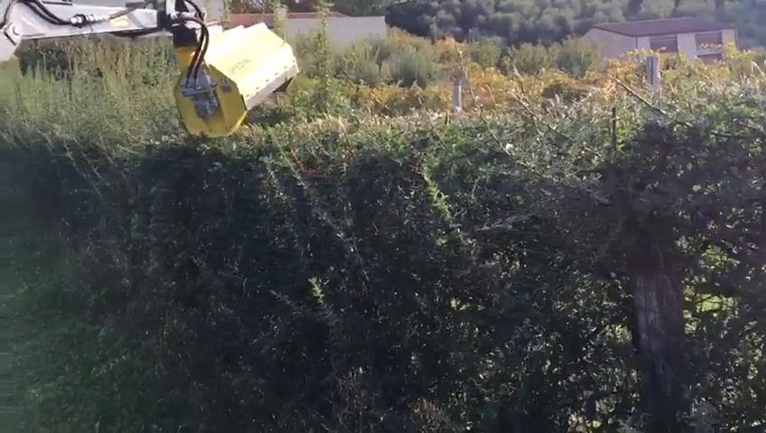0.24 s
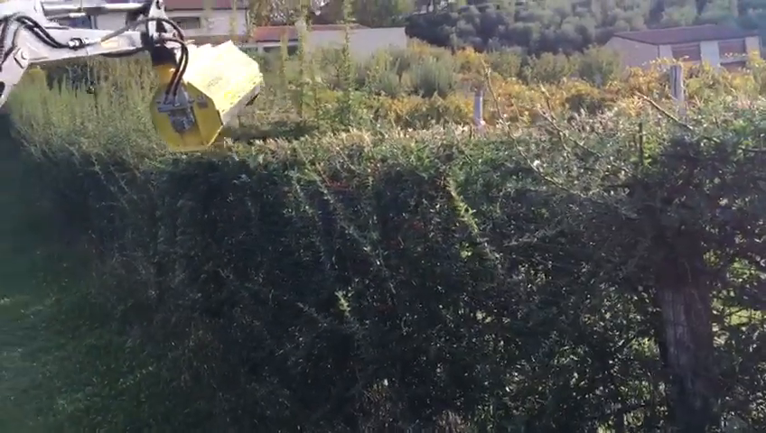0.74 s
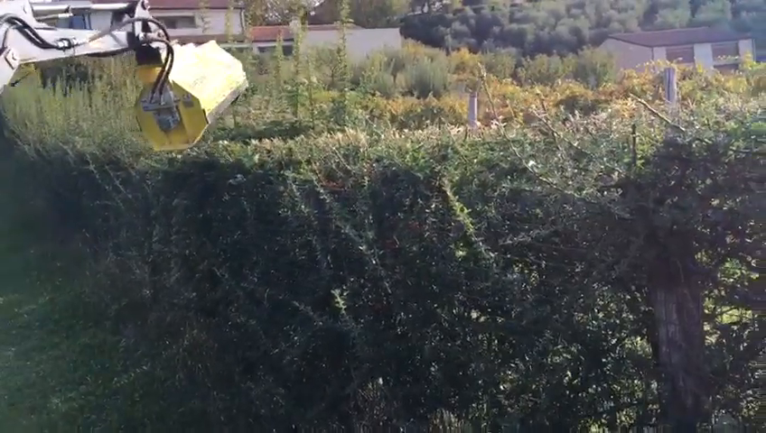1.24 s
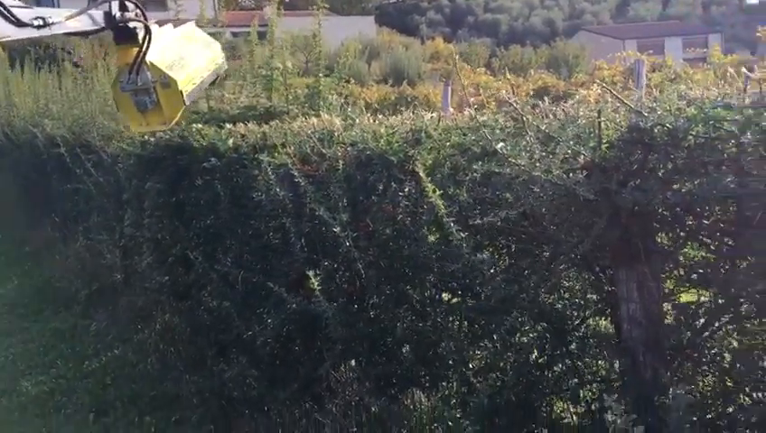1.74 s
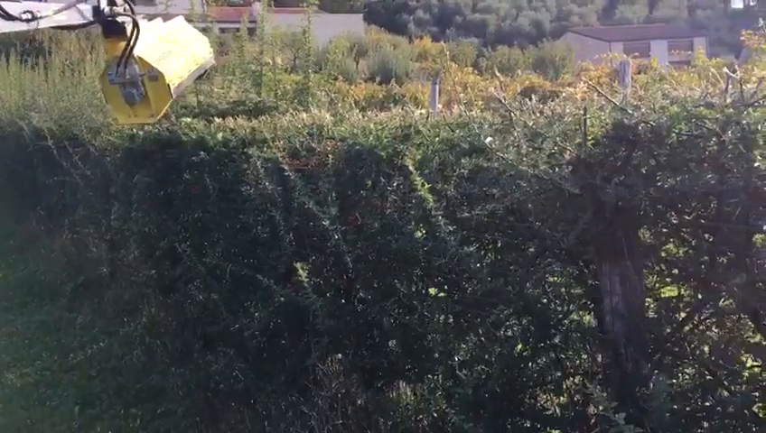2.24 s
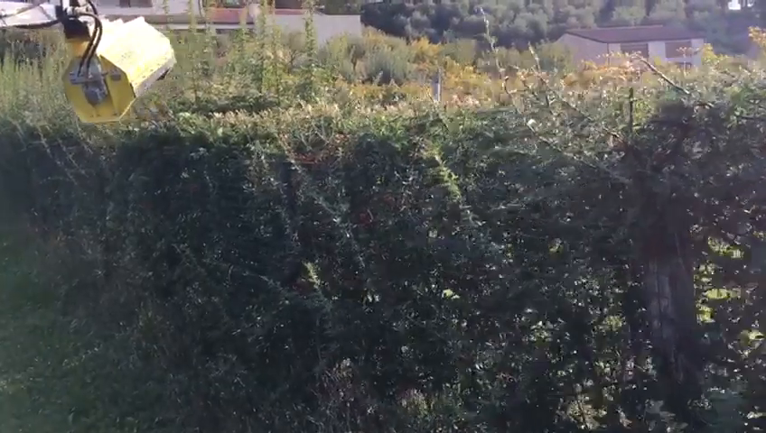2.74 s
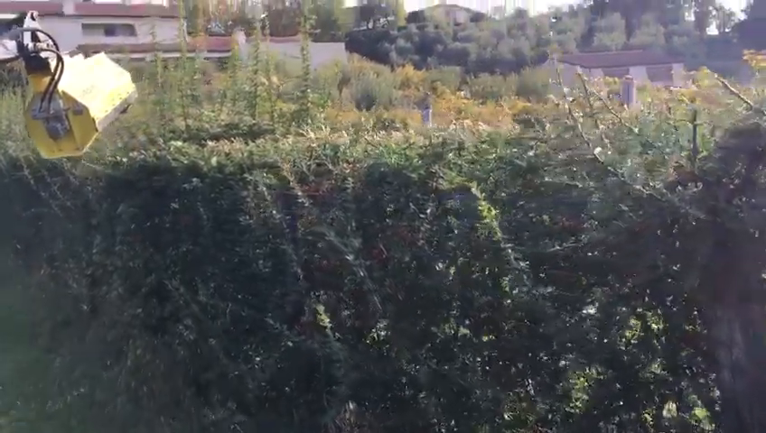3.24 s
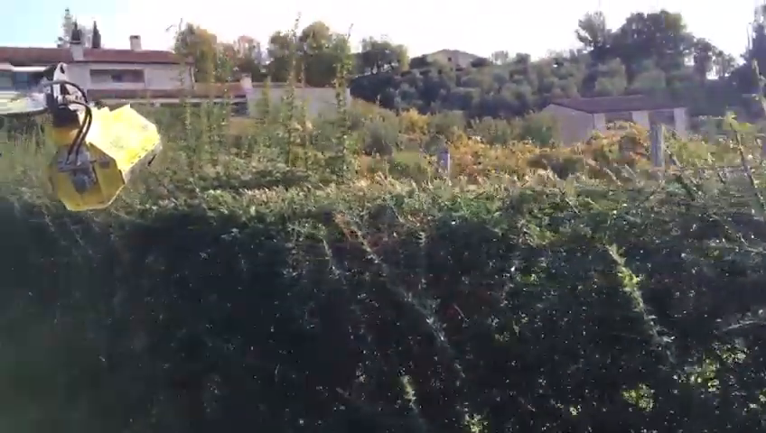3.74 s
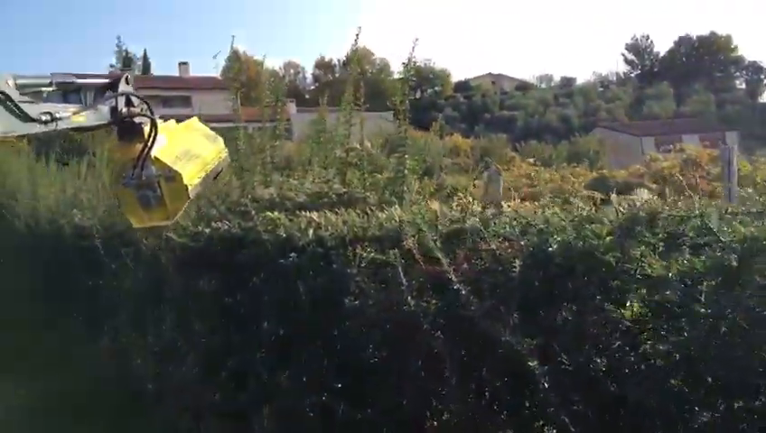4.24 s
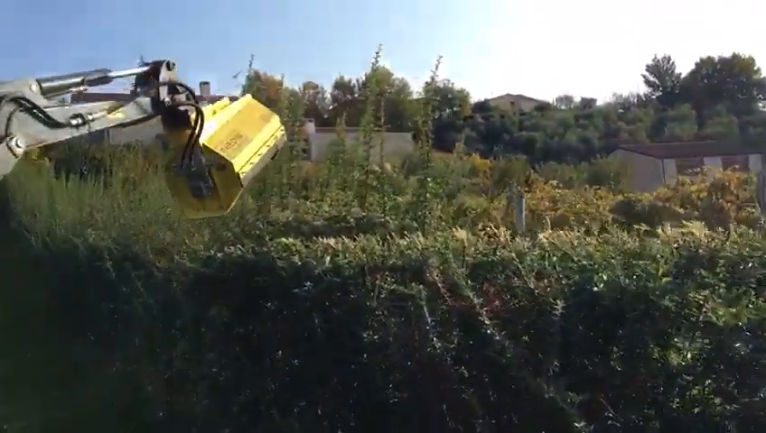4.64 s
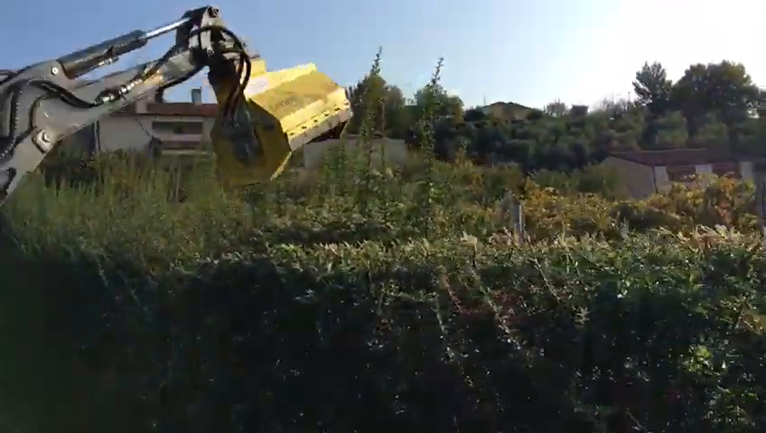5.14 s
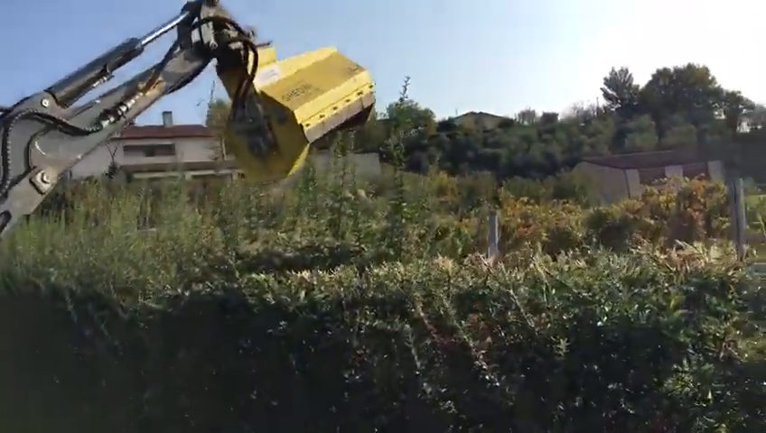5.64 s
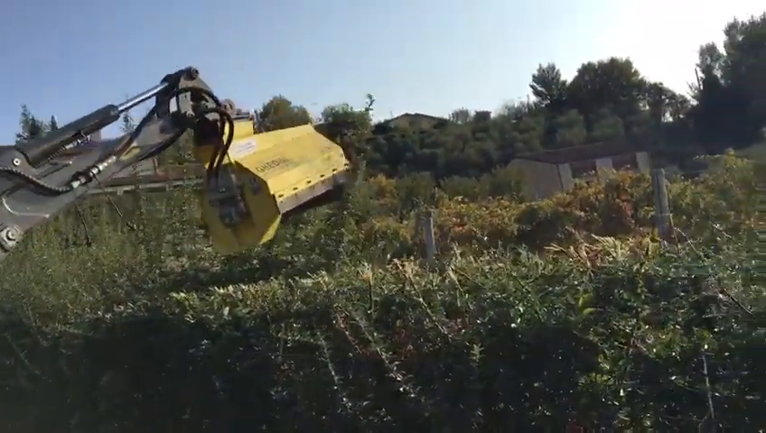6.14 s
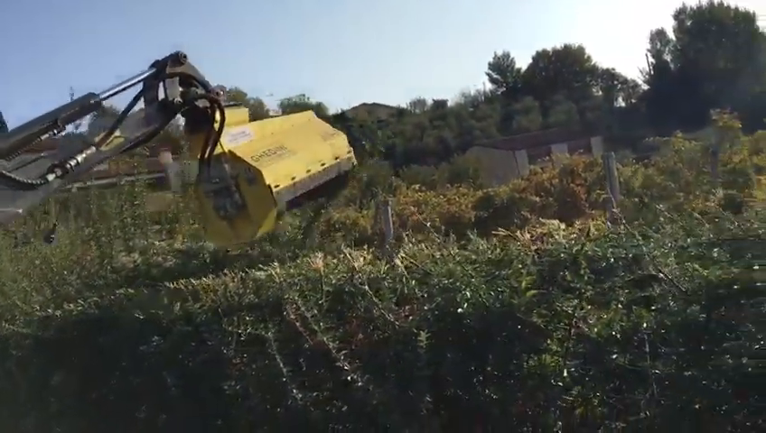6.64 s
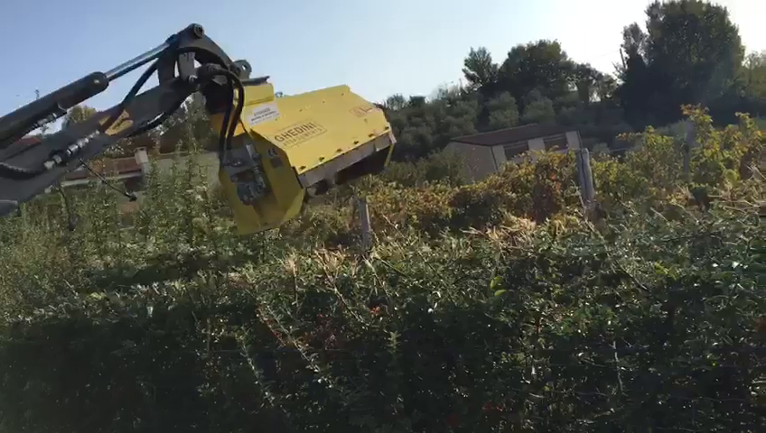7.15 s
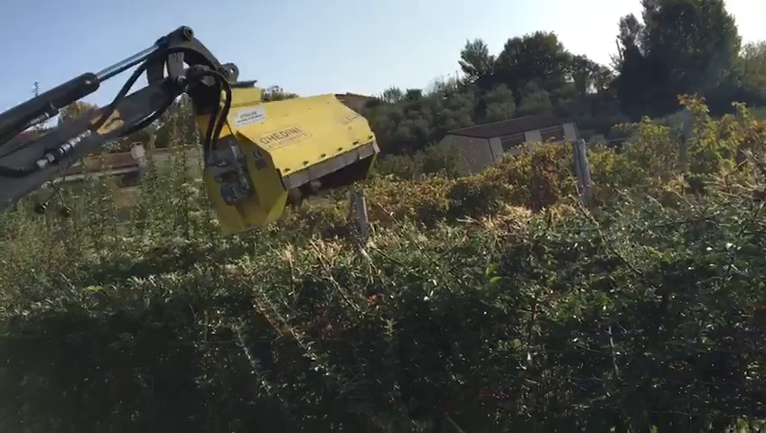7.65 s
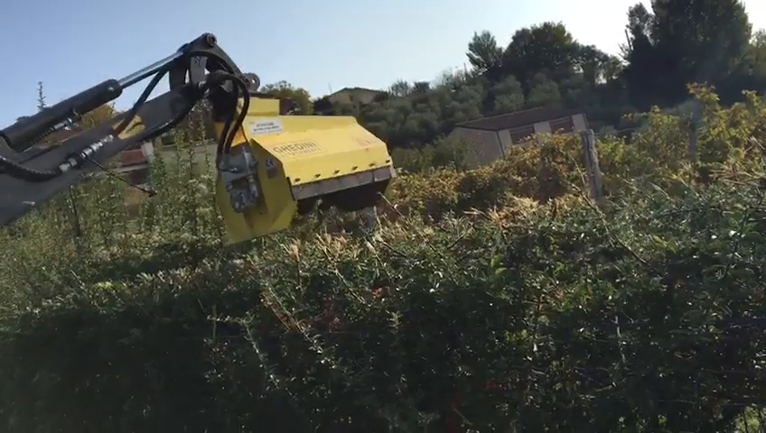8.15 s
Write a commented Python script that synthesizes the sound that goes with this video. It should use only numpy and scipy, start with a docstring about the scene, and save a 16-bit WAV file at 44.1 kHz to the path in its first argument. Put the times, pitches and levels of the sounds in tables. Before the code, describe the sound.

A steady, heavy low diesel drone dominates, its speed dipping slightly under load. Over it come dry clatter, low rumble and hollow cover boom, then the gliding whine of a flail motor and its breathy whirl. Soft leafy swishing comes early, oil hiss around the middle, a sharp little burst of twig snaps near seven seconds, then the whine climbs to the end. Mono, open air, dull on top.

```python
"""The three-cylinder diesel of a mini excavator drones and knocks outdoors, as pulses locked to its firing
rate. The excavator swings a hydraulic flail head over a hedge: the head's motor whines on partials of its gear
tooth rate as it speeds up and slows down, and the rotor churns the air, made of coloured noise. Oil hisses in
the valves, mostly when the boom moves, soft growth swishes against the hood in resonant noise, and a few twigs
are shredded in sprays of tiny snaps."""
import sys
import numpy as np
from scipy import signal
from scipy.fft import rfft, irfft, next_fast_len
from scipy.io import wavfile

SR = 44100
rng = np.random.default_rng(int(sys.argv[2]) if len(sys.argv) > 2 else 0)


def to_wav(s):
    """Save 16-bit WAV."""
    ch = np.atleast_2d(s).T  # columns
    pcm = np.round(np.clip(ch, -1, 1) * 32767)  # PCM
    wavfile.write(sys.argv[1], SR, pcm.astype(np.int16))


N = 369999
TIME = np.arange(N) / SR
CUTOFF_HZ = 11200   # nothing much is heard above this


def from_db(db):
    """Turn decibels into gain."""
    return 10 ** (np.asarray(db) / 20)


def rms_one(x):
    """Scale a signal to a root-mean-square level of 1."""
    return x / np.sqrt(np.mean(x ** 2) + 1e-20)


def in_time(rows):
    """Join the points of a (time, value) table by straight lines."""
    times, values = np.transpose(rows)
    return np.interp(TIME, times, values)


def cycles(rate_hz):
    """Count the cycles of a changing rate since the start."""
    return np.cumsum(rate_hz) / SR


def noise():
    """White noise: all pitches at once."""
    return rng.standard_normal(N)


def drift(rate_hz):
    """Slow random wandering with spread 1, made at every 40th sample and joined by straight lines."""
    step, settle = 40, 2000
    r = np.exp(-2 * np.pi * rate_hz * step / SR)
    steps = rng.standard_normal(N // step + settle + 2)
    slow = signal.lfilter([1], [1, -2 * r, r * r], steps)[settle:]
    return np.interp(np.arange(N) / step, np.arange(len(slow)), rms_one(slow))


def at_hz(spectrum, hz):
    """Read the gain of a (frequency, level) table at given frequencies."""
    points, db = np.transpose(spectrum)
    return from_db(np.interp(np.log(hz), np.log(points), db))


def colour(x, spectrum):
    """Give a sound a spectrum; white noise keeps its power."""
    size = next_fast_len(N + 4096)
    bins = np.maximum(np.fft.rfftfreq(size, 1 / SR), 1)
    gain = at_hz(spectrum, bins) * (bins < CUTOFF_HZ)
    return irfft(rfft(x, size) * rms_one(gain), size)[:N]


def resonate(x, hz, width_hz):
    """Let one resonance ring: the narrower it is, the longer it lasts."""
    r = np.exp(-np.pi * width_hz / SR)
    return signal.lfilter([1, 0, -1], [1, -2 * r * np.cos(2 * np.pi * hz / SR), r * r], x)


def boom(hz, width_hz):
    """A panel shaken at random sounds around its own pitch."""
    once = resonate(noise(), hz, width_hz)
    return rms_one(resonate(once, hz, width_hz))


def partials(phase, table, waver_db, waver_hz, jitter):
    """Sines locked to a shaft, each wavering in level and in phase (jitter in cycles)."""
    total = 0
    for order, db in table:
        level = np.sqrt(2) * from_db(db + waver_db * drift(waver_hz))
        turn = order * phase + rng.random() + jitter * drift(waver_hz)
        total = total + level * np.sin(2 * np.pi * turn)
    return total


def swells(events, ramp_s):
    """Events fade in, hold and fade out; each fade is centred on the start or end of its event."""
    total = 0
    for start, length, db in events:
        inside = np.minimum(TIME - start, start + length - TIME)
        total = total + from_db(db) * np.clip(.5 + inside / ramp_s, 0, 1)
    return total


def follow(x, seconds):
    """Follow a control with some inertia; zero or less follows practically at once."""
    r = np.exp(-1 / (max(seconds, 1 / SR) * SR))
    return x[0] + signal.lfilter([1 - r], [1, -r], x - x[0])


# how far the machine has swung round towards the listener: (time [s], share [0-1])
SWING = [(0, 0.42), (3.6, 0.19), (4.9, 0.79), (8.39, 0.9)]


def swing():
    """The turn of the machine changes how strongly its parts are heard."""
    return in_time(SWING)


# the hood brushes through soft growth: (start [s], length [s], level [dB])
BRUSHES = [(1.22, 0.16, -38), (2.13, 0.35, -39.5), (2.55, 1.08, -39.5), (4.9, 0.5, -49), (6.25, 0.62, -52),
           (7.85, .8, -40.5)]


def leaves():
    """Soft growth swishes against the steel hood: unsteady noise around one resonance."""
    flutter = from_db(1.3 * drift(40))
    return swells(BRUSHES, ramp_s=0.35) * flutter * boom(hz=1160, width_hz=520)


# twigs caught by the flails: (time [s], starting level [dB], time to fall by 8.7 dB [s])
TWIGS = [(6.362, -34.5, 0.035), (6.734, -37.5, 0.08), (6.807, -29, 0.029), (6.82, -34.5, 0.18),
         (6.878, -23.5, 0.014), (6.886, -21, 0.018), (6.905, -21.5, 0.011), (6.912, -28.5, 0.026),
         (6.971, -31.5, 0.016)]
# tone of the snaps: (frequency [Hz], relative level per Hz [dB])
TWIG_TONE = [(900, -10), (1900, -2), (2800, -2.5), (3900, 1.5), (4800, -8.5), (6500, -2), (7100, -1.5),
             (7800, -2.5), (8700, 0.5), (10500, -3.5)]


def twigs(snaps_per_s=3500, spread_db=4):
    """Each twig is torn apart in a dying spray of tiny snaps."""
    power = 0
    for start, db, length in TWIGS:
        dying = np.exp(-2 * np.abs(TIME - start) / length)
        power = power + from_db(db) ** 2 * (TIME >= start) * dying
    strength = from_db(spread_db * np.minimum(rng.exponential(1, N), 3))
    snaps = (rng.random(N) < snaps_per_s / SR) * rng.choice([-1, 1], N) * strength
    return colour(rms_one(snaps) * np.sqrt(power), TWIG_TONE)


# flail motor, spun up in bursts and coasting in between: (time [s], gear tooth rate [Hz])
MOTOR_SPEED = [(0, 440), (.3, 440), (.6, 452), (1.05, 452), (1.45, 502), (1.65, 513), (2.6, 490),
               (3.3, 464), (3.77, 453), (4.08, 496), (4.28, 508), (5.2, 481), (5.93, 452), (6.5, 473),
               (7.3, 475), (7.85, 522), (8.08, 535), (8.39, 538)]


def motor_tooth_rate():
    """The passing gear teeth of the hydraulic motor set its pitch."""
    return in_time(MOTOR_SPEED)


# oil hiss swells, mostly while the boom moves: (start [s], length [s], oil flow level [dB])
OIL_SWELLS = [(2.0, 0.47, -42), (4.0, .45, -49), (4.8, 0.59, -40.5), (8.3, .3, -46)]
# tone of the oil hiss: (frequency [Hz], relative level per Hz [dB])
OIL_TONE = [(1500, -17), (2300, 3.5), (3800, -3), (4700, -7.5), (5400, 2.5), (6200, 0.5), (6900, 3.5),
            (7700, -2.5), (8700, 1.5), (10500, 2.5)]
# pressure ripple heard in the oil: (multiple of the tooth rate, level relative to the flow [dB])
RIPPLE = [(2, -5.5), (3, -6.5), (4, -7), (5, -6.5), (6, -5), (7, -8.5), (8, -9.5), (11, -11), (12, -10.5),
          (14, -14), (18, -14)]
VALVE_RAMP_S, VALVE_LEAK_DB = 0.18, -52   # the valve's opening time; its flow level when shut


def oil_valves():
    """Throttled oil hisses in swells, mostly while the boom moves, with a hoarse ripple from the motor's teeth."""
    ripple = partials(cycles(motor_tooth_rate()), RIPPLE, waver_db=4.5, waver_hz=35, jitter=.3)
    flow = np.hypot(from_db(VALVE_LEAK_DB), swells(OIL_SWELLS, VALVE_RAMP_S))
    return flow * from_db(0.61 * drift(25)) * (colour(noise(), OIL_TONE) + ripple)


# level of the churned air: (time [s], level [dB])
AIR_LEVEL = [(0, -34.5), (.9, -33.5), (2.3, -33), (3.7, -34.5), (5.2, -32), (6.1, -34), (7.3, -32.5),
             (8.39, -31)]
# tone of the churned air: (frequency [Hz], relative level per Hz [dB])
AIR_TONE = [(300, -26.5), (700, -3.5), (950, 0.5), (1400, -2.5), (1900, -3), (2400, -5.5), (2800, -9),
            (4500, -18.5), (10000, -28)]


def rotor_air():
    """The whirling flails churn the air into an unsteady rush of noise."""
    level = from_db(in_time(AIR_LEVEL) + 1.34 * drift(30))
    return level * colour(noise(), AIR_TONE)


# the motor's low partials, before the housing:
# (multiple of the tooth rate, coasting [dB], added when driven [dB], added once swung round [dB])
GROWL = [(1, -54, 16, -3), (2, -45.5, 5, -2.5), (3, -56, 12, -2.5), (4, -57.5, 10, 0.5)]
# how strongly the motor housing radiates them: (frequency [Hz], gain [dB])
HOUSING = [(440, 2), (465, 1.5), (480, 2.5), (540, 1.5), (870, -1.5), (950, 0), (1100, -2), (1350, -0.5),
           (1460, 1.5), (1820, -6), (1910, 5.5), (2100, 0)]


def motor_growl(tooth_hz, drive):
    """The low partials swell as they glide through the resonances of the motor housing."""
    teeth, turn = cycles(tooth_hz), swing()
    total = 0
    for order, coasting_db, driven_db, swung_db in GROWL:
        level = from_db(coasting_db + driven_db * drive + swung_db * turn)
        tone = partials(teeth, [(order, 0)], waver_db=3.0, waver_hz=8.9, jitter=0.04)
        total = total + level * at_hz(HOUSING, order * tooth_hz) * tone
    return total


# high partials, before the hood: (multiple of the tooth rate, relative level [dB])
WHISTLE = [(7, -0.5), (9, -10), (11, -4), (12, -2.5), (13, -1), (14, -6.5), (15, -4), (16, -2), (18, -4)]
# how strongly the flail hood radiates them: (frequency [Hz], gain [dB])
HOOD = [(3000, -6), (4300, 3), (4750, -10.5), (5250, -1.5), (5500, -9), (5850, 4), (6150, 0), (6420, 4.5),
        (6560, -6), (6800, -3.5), (7050, -5.5), (7380, 4), (7600, -13), (8800, -7)]
# gain of all the high partials: coasting, added when driven, added once swung round
WHISTLE_DB, WHISTLE_DRIVEN_DB, WHISTLE_SWUNG_DB = -65, 9.5, 8


def motor_whistle(tooth_hz, drive):
    """The high partials swell as they glide through the resonances of the flail hood."""
    teeth = cycles(tooth_hz)
    total = 0
    for order, db in WHISTLE:
        tone = partials(teeth, [(order, db)], waver_db=3.5, waver_hz=8, jitter=0.039)
        total = total + at_hz(HOOD, order * tooth_hz) * tone
    return from_db(WHISTLE_DB + WHISTLE_DRIVEN_DB * drive + WHISTLE_SWUNG_DB * swing()) * total


# spells in which oil drives the motor: (start [s], length [s], pressure relative to full [dB])
FEEDS = [(.1, 0.93, -7), (1.03, 0.64, .5), (3.8, .45, -3), (6.02, .6, -6), (6.65, 0.97, -1),
         (7.66, 0.54, -1)]


def flail_head():
    """The gear motor whines louder while oil pressure drives it; the flails churn the air."""
    tooth_hz = motor_tooth_rate()
    drive = swells(FEEDS, ramp_s=0.2)   # the pressure takes time to build and to fall
    return motor_growl(tooth_hz, drive) + motor_whistle(tooth_hz, drive) + rotor_air()


# diesel speed, sagging whenever the pump draws power: (time [s], firing rate [Hz])
FIRING = [(0.0, 48.28), (0.58, 48.13), (0.98, 50.96), (1.22, 46.77), (1.76, 49.94), (1.99, 48.66),
          (2.84, 49.65), (3.27, 49.27), (3.48, 50.67), (3.74, 50.43), (3.91, 46.21), (4.2, 48.9),
          (4.82, 49.33), (4.93, 50.01), (5.71, 49.89), (5.88, 46.49), (6.07, 48.6), (6.38, 48.14),
          (6.89, 48.9), (7.63, 47.94), (8.24, 49.65), (8.39, 48.79)]


def firing_rate():
    """The speed of the engine sets how often a cylinder fires."""
    return in_time(FIRING)


FREE_FIRING_HZ, FULL_LOAD_SAG_HZ = 50, 3   # the governor lets the speed droop, which tells the load


def engine_gain(voice):
    """Gain of one of the engine's voices, from the load and from the way the machine faces."""
    free_db, load_db, swung_db, lag_s = voice
    load = (FREE_FIRING_HZ - firing_rate()) / FULL_LOAD_SAG_HZ
    return from_db(free_db + load_db * follow(load, lag_s) + swung_db * swing())


# partials of the belt-driven fan: (multiple of the firing rate, relative level [dB])
FAN = [(4.9, -6.5), (6.73, 0), (13.46, -12.5)]
# the fan's tone swells: (start [s], length [s], gain added to the resting gain [dB])
FAN_SWELLS = [(.05, 0.46, -34.5), (3.8, 0.45, -39.5), (5.85, .85, -37.5), (7.2, .6, -41)]
FAN_REST_DB, FAN_RAMP_S = -43, 0.27   # the fan's gain between its swells, and their fade time


def fan(firings):
    """The cooling fan hums on a few partials that swell now and then."""
    level = from_db(FAN_REST_DB) + swells(FAN_SWELLS, FAN_RAMP_S)
    return level * partials(firings, FAN, waver_db=1.5, waver_hz=4.0, jitter=0.032)


# level of the engine's rumble: (time [s], level [dB])
RUMBLE_LEVEL = [(0, -30.5), (.9, -28), (1.4, -30), (2.2, -29), (3.9, -31.5), (4.6, -28.5), (6.1, -31),
                (8.39, -30)]
# tone of the rumble: (frequency [Hz], relative level per Hz [dB])
RUMBLE_TONE = [(20, -10.5), (45, 1.5), (120, 3), (215, -8), (290, 0), (390, -3.5), (450, -7), (580, -4.5),
               (670, -2), (760, -9), (1100, -22.5), (3000, -44)]


def rumble():
    """The engine rumbles: noise that is strongest at low pitches."""
    return from_db(in_time(RUMBLE_LEVEL)) * colour(noise(), RUMBLE_TONE)


# deep boom: (running free [dB], added at full load [dB], added once swung round [dB], lag behind the load [s])
DEEP_BOOM = (-41.5, 0, 8, 4.2)
# level of the cover's hollow boom: (time [s], level [dB])
HOLLOW_LEVEL = [(0, -39.5), (.45, -31), (.75, -41), (1.2, -39.5), (1.5, -28.5), (2, -38), (3, -39),
                (3.9, -35), (5.6, -55.5), (8.39, -41)]


def engine_cover():
    """The engine cover booms at two pitches of its own."""
    deep = engine_gain(DEEP_BOOM) * boom(hz=192.0, width_hz=120)
    hollow = from_db(in_time(HOLLOW_LEVEL)) * boom(hz=386.3, width_hz=43)
    return deep + hollow


# crack: (running free [dB], added at full load [dB], added once swung round [dB], lag [s], 0 or less = at once)
CRACK = (-53.5, 9, -10.5, -1.8)
# tone of the crack: (frequency [Hz], relative level per Hz [dB])
CRACK_TONE = [(1500, -8.5), (4000, -5.5), (4900, 1), (6000, 2.5), (7700, -6.5), (9000, 6.5), (10500, -1.5)]


def injection(firings, delay=.57, decay=.08):
    """Every firing starts with a short bright crack, louder under load; delay and decay in firing periods."""
    age = (firings - delay) % 1
    cracks = colour(noise() * np.exp(-age / decay), CRACK_TONE)
    return engine_gain(CRACK) * rms_one(cracks)


# combustion knock, one row a cylinder: (relative clatter [dB], relative block ring [dB])
CYLINDERS = [(0, 0.5), (-8.5, 2.5), (0, -6)]
# tone of the casing's clatter: (frequency [Hz], relative level per Hz [dB])
CLATTER_TONE = [(1200, -19), (2300, -4), (3020, -3.5), (3180, 4.5), (3700, 2), (4400, 2.5), (4900, -7),
                (5800, -2.5), (6600, -6), (7800, -8.5), (9000, -7.5), (10500, -12)]
# level of the casing's clatter: (time [s], level [dB])
CLATTER_LEVEL = [(0, -36), (.8, -38), (3, -36.5), (5.2, -38), (5.8, -40), (7.3, -38.5), (8.39, -37.5)]
# modes of the engine block: (frequency [Hz], width [Hz], relative blow strength [dB])
BLOCK_MODES = [(2176, 140, -2.5), (2342, 72, -1.5)]
# level of the engine block's ring: (time [s], level [dB])
BLOCK_LEVEL = [(0, -40), (1.9, -41.5), (2.5, -42.5), (3.7, -47), (4.7, -39), (5.6, -48.5), (6.7, -42.5),
               (8, -43.5), (8.39, -40.5)]


def combustion(firings, delay=.57, decay=0.2, scatter_db=2.26):
    """Each firing rattles the casing and rings the block, as hard as its cylinder; times in firing periods."""
    stroke, age = np.divmod(firings - delay, 1)
    stroke = stroke.astype(int)
    rattle_db, ring_db = np.array(CYLINDERS)[stroke % 3].T
    chance_db = scatter_db * rng.standard_normal((stroke.max() + 2, 2))   # no two firings are alike
    rattle_chance_db, ring_chance_db = chance_db[stroke].T

    bursts = from_db(rattle_db + rattle_chance_db) * np.exp(-age / decay)
    steady = .52   # some rattle goes on between the bursts
    clatter = rms_one(colour(noise() * np.hypot(steady, bursts), CLATTER_TONE))

    fires = np.diff(stroke, prepend=stroke[0]) > 0
    blows = fires * from_db(ring_db + ring_chance_db)
    block = 0
    for hz, width_hz, db in BLOCK_MODES:
        block = block + from_db(db) * resonate(blows * rng.choice([-1, 1], N), hz, width_hz)
    block = resonate(block, hz=2180, width_hz=580)   # the cover takes a moment to pick up the ring
    return from_db(in_time(CLATTER_LEVEL)) * clatter + from_db(in_time(BLOCK_LEVEL)) * rms_one(block)


# four exhaust voices, each: (running free [dB], added at full load [dB], added once swung round [dB],
# lag behind the load [s], 0 or less = at once)
THUD = (-24, -9.5, 1.5, .09)
DRONE = (-14.5, 1.8, 0.5, .16)
THIRD_HARMONIC = (-29.5, 7.5, -8, -0.4)
EXHAUST_EDGE = (-2.5, -1, 3.5, 2.5)   # a gain on all the overtones
# how squarely the tailpipe faces the listener: (time [s], change of the drone's level [dB])
TAILPIPE = [(0, -0.5), (3.6, -1.1), (4.3, -0.6), (7.1, -2.6), (8.39, -2.7)]
# exhaust overtones, before the edge gain: (cycles per round of three firings, level [dB])
OVERTONES = [(7, -38.5), (8, -47), (10, -41), (12, -33.5), (15, -39), (18, -43.5), (21, -53), (24, -46.5),
             (27, -56.5), (30, -48)]


def exhaust(firings, unsteady=0.0018):
    """The silencer booms at twice the firing rate; load trades thud for third harmonic; cylinders differ."""
    phase = 2 * np.pi * (firings + unsteady * drift(8.6))
    thud = engine_gain(THUD) * from_db(0.37 * drift(4.4)) * np.cos(phase)
    facing = from_db(in_time(TAILPIPE) + 0.26 * drift(31))
    drone = engine_gain(DRONE) * facing * np.sin(2 * phase)
    third = engine_gain(THIRD_HARMONIC) * from_db(1.2 * drift(9)) * np.sin(3 * phase)
    # unequal cylinders add lines between the multiples of the firing rate
    overtones = partials(firings / 3, OVERTONES, waver_db=1.5, waver_hz=4, jitter=.025)
    return np.sqrt(2) * (drone + third - thud) + engine_gain(EXHAUST_EDGE) * overtones


def diesel():
    """Fan, rumble, booming cover, knock and exhaust; all but rumble and cover keep step with the firings."""
    firings = cycles(firing_rate())
    knock = injection(firings) + combustion(firings)
    return fan(firings) + rumble() + engine_cover() + knock + exhaust(firings)


def scene():
    """The whole machine in open air, from the background to the engine."""
    return (leaves() + twigs() + oil_valves() + flail_head() + diesel())[None]


def record(dry):
    """The top is cut steeply."""
    return signal.sosfilt(signal.cheby2(14, 60, CUTOFF_HZ, fs=SR, output="sos"), dry)


dry = scene()
out = record(dry)
to_wav(out)
```